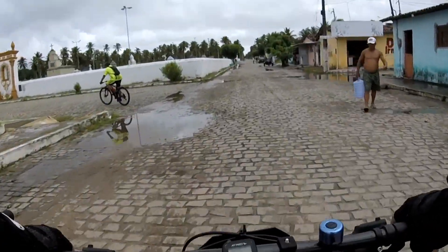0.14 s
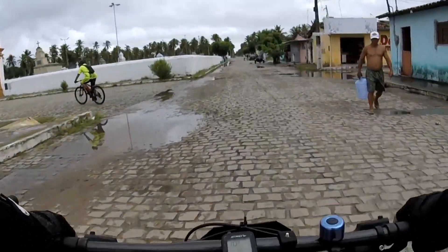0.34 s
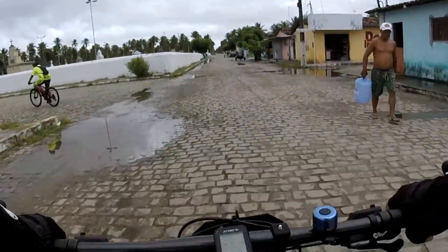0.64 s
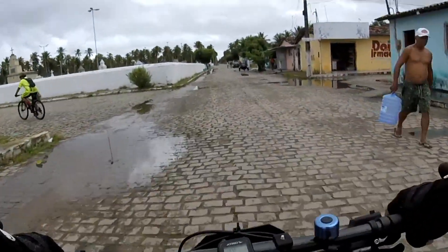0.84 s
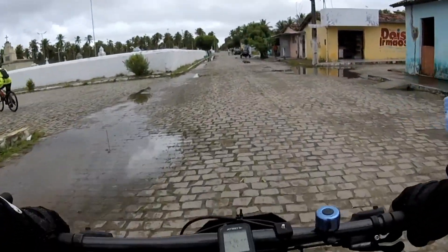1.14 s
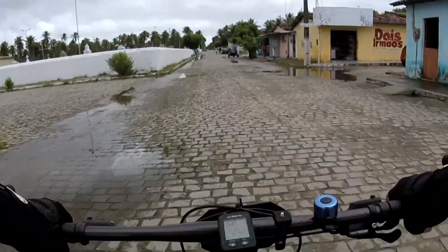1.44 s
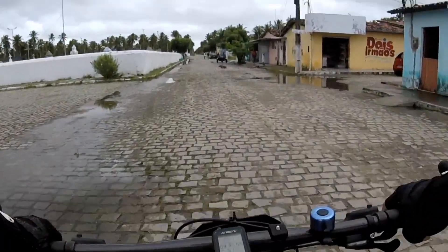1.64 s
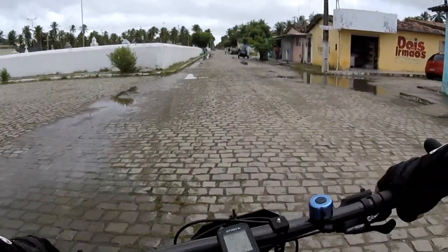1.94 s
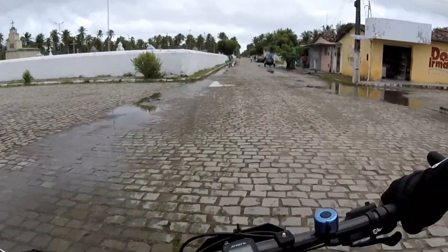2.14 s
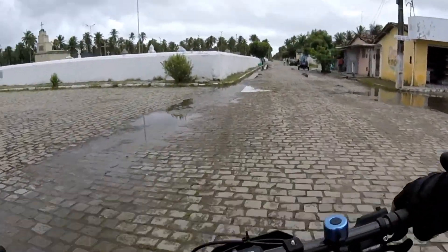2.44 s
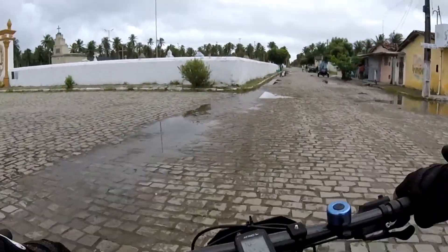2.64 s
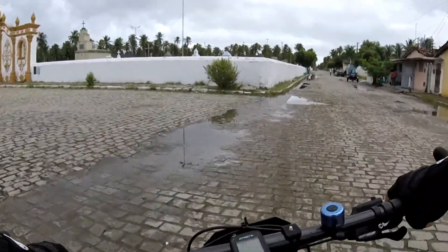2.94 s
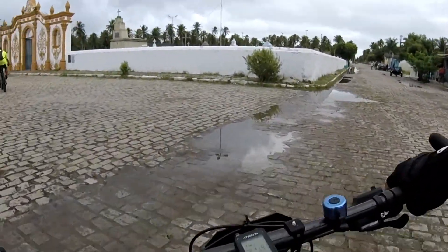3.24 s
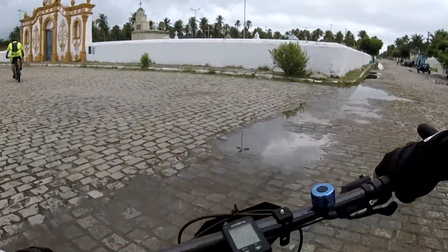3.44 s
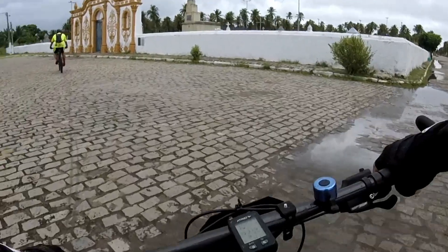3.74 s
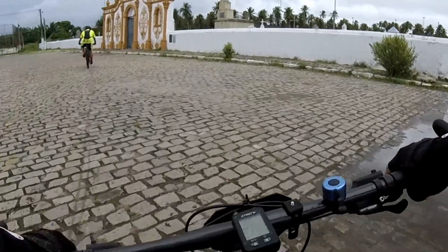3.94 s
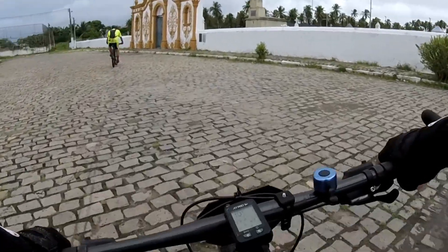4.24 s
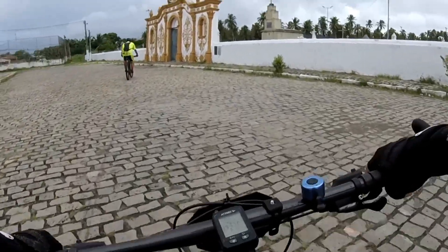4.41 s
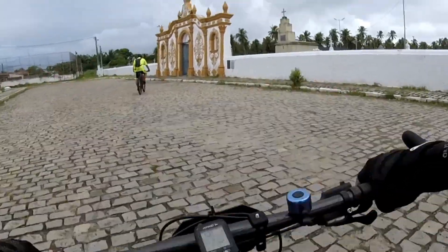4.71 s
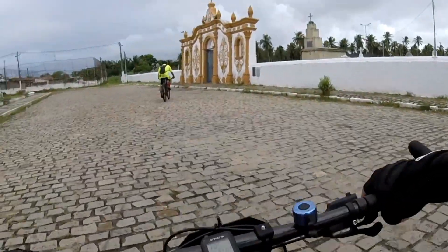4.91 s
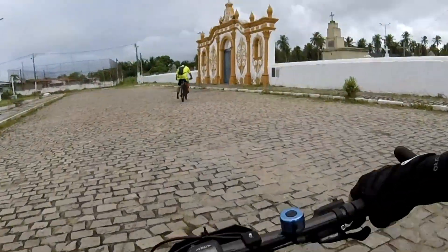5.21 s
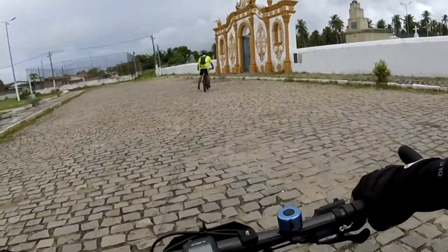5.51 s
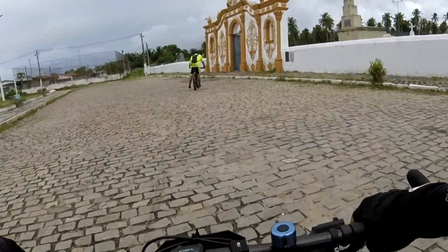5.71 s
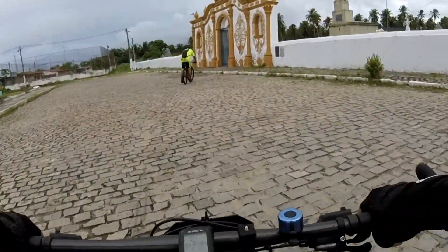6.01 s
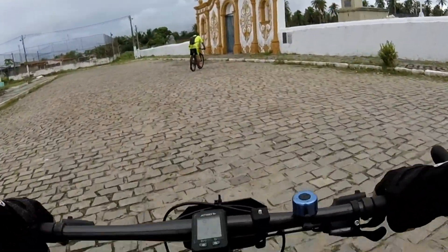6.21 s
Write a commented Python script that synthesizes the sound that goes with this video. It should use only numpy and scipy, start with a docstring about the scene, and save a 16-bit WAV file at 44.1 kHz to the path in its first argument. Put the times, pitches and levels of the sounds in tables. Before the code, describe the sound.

A bicycle coasts over rough cobblestones, its loose parts rattling and knocking above low bumps, while the freewheel ticks until pedalling resumes.

```python
"""Bicycle coasting over cobblestones

A small camera strapped to the rider hears the stones shake its mount (low noise) and jolt the frame
(short dying swings). Loose parts chatter and rattle in bursts: clicks that ring the frame's resonances.
The freewheel's clicks ring the hub; they slow and stop when the rider pedals again.
Tyres and street hiss underneath as coloured noise."""
import sys
import numpy as np
from scipy import signal
from scipy.fft import rfft, irfft
from scipy.io import wavfile
from scipy.ndimage import uniform_filter1d

SR = 44100
rng = np.random.default_rng(int(sys.argv[2]) if len(sys.argv) > 2 else 0)


def dump(signal):
    """Clip the signal to [-1, 1] and save it as 16-bit WAV at the path in sys.argv[1]."""
    limited = np.clip(np.atleast_2d(signal).T, -1, 1)
    pcm = np.round(limited * 32767).astype(np.int16)
    wavfile.write(sys.argv[1], SR, pcm)


N = 280464
T = np.arange(N) / SR  # time of every sample [s]

# a wheel meets a high stone: (time [s], level before build-up and decay [dB], base rate of the swing [Hz])
JOLT_EVENTS = [(0.046, -40, 60), (0.098, -33.5, 104), (0.212, -37, 130), (0.356, -35, 68),
               (0.393, -46, 73.5), (0.434, -37, 74.4), (0.468, -38, 112), (0.66, -40, 108),
               (0.702, -45, 103), (1.302, -41, 117), (1.55, -37.5, 63.3), (1.93, -40.5, 101),
               (2.3, -37.5, 70), (2.334, -46, 70), (2.447, -38.5, 155), (2.57, -36.5, 83.6),
               (2.738, -34.5, 100), (2.96, -32.5, 61), (2.981, -22.5, 91.4), (3.009, -34, 81),
               (3.178, -50, 85.5), (3.345, -46, 72), (3.45, -55, 90), (3.6, -37, 99), (3.651, -47, 71),
               (3.729, -28.5, 97), (3.8, -38.5, 82.5), (3.95, -52, 84.5), (4.115, -40.5, 93),
               (4.303, -28, 71), (4.359, -45, 66), (4.593, -41, 136), (4.756, -37, 81),
               (4.797, -31.5, 73.3), (5.182, -32, 65), (5.203, -33, 59.6), (5.235, -47, 76),
               (5.373, -22, 89.4), (5.447, -35.5, 158), (5.893, -37.5, 96), (6.005, -52, 84),
               (6.135, -38, 132)]
# bursts of rattling: (time [s], level [dB], length before a stretch of 1.3 [s],
# dull part against that level [dB], bright part against that level [dB])
RATTLE_BURSTS = [(0.013, -44, 0.004, 10.5, -5), (0.037, -47, 0.014, -4, -3), (0.053, -46, 0.004, -8, -3),
                 (0.088, -55, 0.008, -12, -20), (0.103, -57, 0.005, -2, -12),
                 (0.125, -52.5, 0.024, -16, -5.5), (0.332, -46.5, 0.0064, -7, -12),
                 (0.406, -56, 0.018, 10, 1), (0.67, -65, 0.012, 6, 6), (0.704, -48, 0.019, -2, -5.5),
                 (0.848, -66.5, 0.02, 16.5, 1), (0.86, -52, 0.0088, -8, -1), (0.889, -48.5, 0.0054, 1, -27),
                 (1.004, -66, 0.012, 15, 0), (1.256, -66, 0.003, -8, 8), (1.308, -54, 0.0093, 4, -14),
                 (1.323, -60, 0.015, 12.5, 0), (1.354, -71, 0.011, -5, -8), (1.386, -71, 0.0067, -5, 5),
                 (1.497, -53.5, 0.013, -9, 1.5), (1.511, -48, 0.0063, -9, -6),
                 (1.52, -43.5, 0.0033, 0, -13), (1.533, -47, 0.016, -13, -21),
                 (1.555, -39.5, 0.0054, -4, -9), (1.569, -49, 0.0094, -4, 1.5), (1.601, -54, 0.01, -11, 1),
                 (1.617, -47.5, .009, -7, -5.5), (1.951, -50, 0.0082, -10, -28),
                 (2.017, -55, 0.01, -15, -6), (2.347, -53, 0.013, -12, -7), (2.436, -60, 0.018, 12, -2),
                 (2.603, -56, .01, 5.5, -5), (2.728, -46, 0.0072, -12, -20), (2.741, -57, 0.011, 8.5, -18),
                 (2.931, -41.5, 0.0019, 1, -23), (2.937, -45.5, 0.014, -14, -7),
                 (2.946, -41, 0.0025, -13, -5), (2.979, -41, 0.004, -3, -9),
                 (2.987, -41.5, 0.0067, -3, -17), (2.999, -53, .006, -6, 3), (3.02, -49, .012, -6, -12),
                 (3.227, -54, 0.022, -15, -25), (3.38, -44, 0.0072, -22, -15),
                 (3.396, -70, 0.0044, -15, -18), (3.478, -59, 0.0095, 8, -3),
                 (3.612, -44.5, 0.0071, -14, -36), (3.636, -54, .012, -6, -8),
                 (3.656, -50.5, 0.012, 6, -2.5), (3.673, -49.5, 0.014, 2, -5), (3.705, -49, 0.0027, 0, -7),
                 (3.729, -47, .009, -6, -25), (3.756, -53.5, 0.016, -29, -1), (3.799, -49, 0.005, -12, -20),
                 (3.8088, -41.5, 0.0019, -1, -10.5), (3.975, -58, 0.0066, -4, 4),
                 (4.011, -56, 0.0075, 3.5, -3), (4.019, -55, 0.013, 2, 2.5), (4.046, -68, 0.0043, -1, -5),
                 (4.131, -50.5, 0.01, 2, -15), (4.193, -51, 0.0095, -16, -24),
                 (4.288, -42.5, .006, -6, -18), (4.298, -44, 0.011, -2.5, -11.5),
                 (4.355, -52, 0.0097, -9, -3), (4.375, -46.5, 0.014, -12, -7.5), (4.39, -50, 0.013, 0, -14),
                 (4.408, -54, 0.0068, -2, -11), (4.503, -70, .005, -8, -14), (4.54, -73, .005, -13, -14),
                 (4.599, -54, 0.02, -4, -18), (4.638, -50, .016, -10, -14), (4.685, -56, 0.012, 6.5, 2),
                 (4.691, -49.5, 0.018, -6, -12), (4.708, -65, .012, -12, 5), (4.767, -47, .01, -4, -16),
                 (4.78, -46, 0.014, -3, -9), (4.792, -56, 0.0098, -6, 1), (4.824, -43, 0.013, -4, -6),
                 (4.835, -45.5, .016, -5, -7), (4.922, -51, 0.008, 1, -14), (4.937, -53, 0.019, -6, -3),
                 (5.067, -65, 0.0053, -8, -14), (5.126, -50, 0.0086, -10, -15),
                 (5.167, -50.5, 0.023, -11, -33), (5.205, -53, 0.011, 7, -1), (5.224, -59, 0.011, -9, 4),
                 (5.261, -45, 0.0035, -12, -22), (5.279, -52, .018, -19, -25),
                 (5.308, -48.5, 0.0089, 0, -2), (5.3646, -35.5, 0.0018, 0.5, -20),
                 (5.37, -48, 0.011, -8, -21), (5.384, -50, 0.003, -5, -20), (5.409, -60, 0.012, -15, -20),
                 (5.428, -67, 0.006, -10, 0), (5.49, -48, 0.0053, -2, -19), (5.578, -45, 0.0069, -19, -17),
                 (5.623, -53.5, 0.027, -4, -16), (5.731, -66, 0.021, -7, -20),
                 (5.871, -54, 0.0061, -5, -15), (5.884, -49, 0.0044, 4, -16), (5.895, -46, 0.013, -9, -25),
                 (5.955, -60, 0.008, -10, -8), (5.974, -57, 0.003, 6, -10), (6.03, -66, 0.003, -10, 5),
                 (6.17, -58, 0.01, 3, -10), (6.091, -52, 0.0085, 0, -27), (6.249, -49, 0.008, -6, -22),
                 (6.256, -55, 0.005, 9, -22), (6.311, -53, .015, -12, -25), (6.288, -46, 0.0054, -16, -18),
                 (6.331, -47.5, 0.008, -1, -20), (6.345, -46, 0.005, -3, -10)]
# what the knocked frame and mount ring with, in dull, main, hard, bright and thin groups:
# (pitch [Hz], width of one filter pass [Hz], relative level [dB])
FRAME_MODES = [
    [(329, 254, 4.5), (464, 125, -3), (564.6, 297, 2), (746, 363, -3.5)],
    [(1315, 266, 2.5), (1463, 230, -1.5), (1608, 117, -5)],
    [(2191, 400, 4), (2528, 640, 3)],
    [(2847, 110, 4), (3534, 360, 2.5), (4006, 130, 0.5), (4130, 170, -0.5)],
    [(6360, 450, 0.5), (7250, 790, 1), (8230, 1040, -2.5)],
]


def amp(db):
    """Turn decibels into a plain factor."""
    return 10 ** (np.asarray(db) / 20)


def evened(x):
    """Scale a signal to an average (RMS) size of one."""
    return x / np.sqrt(np.mean(x ** 2) + 1e-20)


def curve(table, index):
    """Draw straight lines through one column of a table, sample by sample."""
    rows = np.array(table)
    return np.interp(T, rows[:, 0], rows[:, index])


def noise(spectrum):
    """Steady noise of unit size, coloured by a table of pitch and level."""
    f, db = np.transpose(spectrum)
    hz = np.fft.rfftfreq(N, 1 / SR)
    colour = amp(np.interp(np.log(hz + 1), np.log(f + 1), db))
    return evened(irfft(rfft(rng.standard_normal(N)) * colour, N))


def flicker(seconds):
    """Random wandering of unit size: noise averaged twice over the given time."""
    width = int(seconds * SR)
    return evened(uniform_filter1d(uniform_filter1d(rng.standard_normal(N), width), width))


def ring(clicks, modes):
    """Every click swells and dies in each resonance; filtering twice keeps the gaps between them dark."""
    out = np.zeros(N)
    for hz, width, db in modes:
        b, a = signal.iirpeak(hz, hz / width, SR)
        once = signal.lfilter(b, a, clicks)
        twice = signal.lfilter(b, a, once)
        out += amp(db) * twice * np.sqrt(SR / width)
    return out


def settling(table, db, seconds):
    """A level that jumps at each event of a table and dies away."""
    rows = np.array(table)
    jumps = np.bincount((rows[:, 0] * SR).astype(int), amp(rows[:, 1] + db), N)
    return signal.lfilter([1], [1, -np.exp(-1 / (seconds * SR))], jumps)


def shaking():
    """The microphone sways with the body and picks up a lumpy rumble through its mount."""
    # colour of the body's sway: (pitch [Hz], relative level per Hz [dB])
    sway_colour = [(3, -40), (6, -3), (14, 0), (24, -5), (32, -14), (44, -34), (70, -70), (200, -130)]
    # strength of the sway before its flicker: (time [s], level [dB])
    sway_db = [(0.0, -32), (0.23, -30), (0.28, -51), (0.34, -27), (0.6, -40.5), (0.92, -28), (0.96, -48),
               (1.03, -32), (1.08, -50), (1.27, -31), (1.4, -37), (1.47, -29), (1.5, -38.5), (1.7, -34.5),
               (1.73, -43), (1.81, -26.5), (1.91, -38), (1.96, -33), (2.09, -45), (2.16, -33), (2.37, -36),
               (2.55, -30.5), (2.67, -44), (2.74, -22.5), (2.89, -41), (3.01, -22.5), (3.06, -38.5),
               (3.7, -33), (3.74, -35), (3.79, -24.5), (3.9, -47), (4.07, -28), (4.22, -50.5),
               (4.34, -33.5), (4.52, -52), (4.66, -28), (4.76, -41), (4.82, -32.5), (5.14, -36),
               (5.19, -26), (5.28, -37), (5.45, -23), (5.54, -50.5), (5.76, -33), (5.81, -44.5),
               (5.97, -34), (6.32, -38), (6.36, -27)]
    # how hard the stones shake the mount, before flicker and jolts: (time [s], level [dB])
    road_db = [(0.0, -39.5), (0.19, -55), (0.21, -49), (0.28, -57.5), (0.41, -42), (0.55, -53.5),
               (0.64, -56), (0.67, -44), (0.76, -51.5), (1.22, -54), (1.24, -60), (1.31, -48.5),
               (1.43, -54.5), (1.52, -47.5), (1.91, -55), (1.93, -48.5), (2.23, -54.5), (2.32, -47),
               (2.43, -55), (2.46, -44), (2.5, -58), (2.58, -44), (2.62, -55.5), (2.74, -42), (2.85, -53),
               (2.92, -54.5), (2.99, -36), (3.12, -63.5), (3.21, -48.5), (3.22, -53.5), (3.35, -44.5),
               (3.42, -72), (3.47, -44), (3.51, -54.5), (3.75, -40), (3.91, -55), (3.95, -49.5),
               (4.27, -52.5), (4.32, -42), (4.46, -53), (4.55, -58), (4.6, -47), (4.71, -49), (4.8, -41.5),
               (4.92, -54.5), (4.96, -49), (5.01, -54), (5.05, -47), (5.12, -58), (5.21, -43), (5.31, -53),
               (5.38, -36.5), (5.42, -49), (5.58, -51), (5.86, -52), (5.91, -44), (5.99, -57), (6.0, -53.5),
               (6.31, -50.5), (6.36, -39.5)]
    # colour of the rumble: (pitch [Hz], relative level per Hz [dB])
    rumble_colour = [(20, -38), (35, -0.5), (60, -7), (140, -13), (220, -21.5), (400, -25), (900, -66),
                     (3000, -110)]

    sway = noise(sway_colour)
    # smooth out the noise's own swells, so that its size follows the level table
    power = uniform_filter1d(uniform_filter1d(sway ** 2, 3000), 3000)
    sway = sway / np.sqrt(power + .1)
    sway_level = amp(curve(sway_db, index=1) + 2.0 * flicker(0.029))

    # the rumble swells after each jolt and settles
    rumble_level = amp(curve(road_db, index=1)) + settling(JOLT_EVENTS, db=-22.5, seconds=0.013)
    lumps = amp(2.5 * np.minimum(flicker(0.016), 2))
    return sway_level * sway + rumble_level * lumps * noise(rumble_colour)


def chatter():
    """Countless small knocks in clumps, a few much larger; each strikes the groups of modes unevenly."""
    # how hard loose parts chatter, before flicker and bursts: (time [s], level [dB])
    chatter_db = [(0.0, -53), (0.12, -59), (1.31, -61), (1.72, -58), (2.43, -58.5), (2.8, -60), (3.26, -62),
                  (3.56, -58.5), (4.27, -59.5), (4.41, -61.5), (4.66, -63), (4.78, -58), (5.15, -59),
                  (5.33, -56.5), (6.02, -63), (6.36, -62.5)]
    # share of each group of frame modes, dull to thin: one level each [dB]
    parts_db = (-6.5, -6, -8, -16.5, -22)

    knocks_per_s = 800 * amp(3.5 * flicker(0.0074))
    sizes = amp(2.06 * np.minimum(rng.exponential(1, N), 5))
    knocks = sizes * (rng.random(N) < knocks_per_s / SR)
    out = np.zeros(N)
    for db, modes in zip(parts_db, FRAME_MODES):
        out += amp(db) * evened(ring(knocks * rng.standard_normal(N), modes))
    # the chatter swells around each burst
    swell = uniform_filter1d(settling(RATTLE_BURSTS, db=-14.5, seconds=0.023), int(0.02 * SR))
    level = amp(curve(chatter_db, index=1)) + swell
    return level * amp(1.5 * flicker(0.037)) * out


def hiss():
    """Tyres on damp stone and the open street: coloured noise, flickering fast and faintly."""
    # colour of tyres and street: (pitch [Hz], relative level per Hz [dB])
    hiss_colour = [(90, -42), (150, -2), (325, -6), (780, -9.5), (1100, -12.5), (1280, -7), (2340, -13),
                   (3120, -15), (4700, -22), (8500, -28), (12700, -34.5), (14100, -39), (15200, -41)]
    # strength of the hiss before a fixed lift and its flicker: (time [s], level [dB])
    hiss_db = [(0.0, -69), (0.96, -69), (1.68, -69), (1.86, -69.5), (5.3, -70), (6.15, -71), (6.36, -71.5)]
    lift_db = 12.0
    return amp(curve(hiss_db, index=1) + lift_db + 1.5 * flicker(0.0065)) * noise(hiss_colour)


def freewheel():
    """Two pawls snap over the ratchet teeth and shiver, ringing the hub; pedalling locks them."""
    # the coasting freewheel: (time [s], teeth passing each pawl a second [1/s], level [dB])
    coasting = [(0, 57, -71), (.45, 64, -62), (.7, 59, -61), (.85, 65, -64), (1.0, 58, -59), (1.2, 62, -64),
                (1.5, 65, -60.5), (1.85, 58, -66), (2.1, 66, -62), (2.3, 58, -63.5), (2.6, 66, -63.5),
                (2.85, 66, -62.5), (3.1, 59, -60), (3.3, 65, -63), (3.55, 60, -64.5), (3.8, 66, -62.5),
                (4.1, 60, -64.5), (4.3, 60, -61.5), (4.55, 50, -61), (4.8, 48, -62), (4.95, 72, -58),
                (5.1, 53, -61.5), (5.25, 42, -67), (5.4, 42, -63), (5.55, 40, -64), (5.7, 41, -59),
                (5.77, 28, -58.5), (5.83, 20, -61)]
    # what the hub rings with: (pitch [Hz], width of one filter pass [Hz], relative level [dB])
    hub_modes = [(2690, 140, 5.5), (2790, 120, 6), (2905, 125, 2.5), (3230, 840, -10), (13700, 450, -23),
                 (14050, 450, -21)]

    teeth = np.cumsum(curve(coasting, index=1)) / SR
    # a pawl snaps at each whole tooth, a little early or late; the second lags by a quarter tooth
    first = np.diff(np.floor(teeth + .08 * flicker(.01)), prepend=0) > 0
    second = np.diff(np.floor(teeth - .25 + .07 * flicker(.01)), prepend=0) > 0
    unlocked = T < coasting[-1][0]
    snaps = (first + 0.35 * second) * unlocked * amp(3.0 * flicker(0.025))

    t = np.arange(600) / SR
    shiver = np.exp(-t / 0.003) * rng.standard_normal(len(t)) * 0.12
    shiver[0] = 1  # the snap itself
    snaps = signal.oaconvolve(snaps, shiver)[:N]

    hub = np.zeros(N)
    for mode in hub_modes:
        uneven = amp(2.8 * np.clip(flicker(0.0064), -2, 1.5))
        hub += ring(snaps * uneven, [mode])
    return amp(curve(coasting, index=2)) * evened(hub)


def rattles():
    """Each burst is a firm knock and uneven rebounds; every blow strikes each group of modes its own way."""
    rebounds = 36  # blows in a burst, the firm knock included
    peak, edge_db = 0.25, 25  # peak as a share of the burst; loss by squared distance from it [dB]
    knock_s = 0.0021  # the shorter a burst against this, the more it is one firm knock [s]
    s, db, length, dull_db, bright_db = np.transpose(RATTLE_BURSTS)[:, :, None]
    # the hard and thin groups follow the bright part in proportion
    hard_db = -7.5 + 0.24 * bright_db
    thin_db = -14.5 + bright_db
    parts_db = dull_db, 0, hard_db, bright_db, thin_db

    when = rng.random((len(s), rebounds))  # place within the burst, 0 to 1
    when[:, 0] = peak  # the firm knock
    at = np.minimum(((s + 1.3 * length * when) * SR).astype(int), N - 1)
    fade_db = edge_db * (when - peak) ** 2
    out = np.zeros(N)
    for part_db, modes in zip(parts_db, FRAME_MODES):
        size = (2 * rng.random(when.shape) - 1) ** 3  # cubed: many small blows, few large
        size = 0.29 * size / np.sqrt(np.mean(size ** 2, axis=1, keepdims=True)) / (1 + knock_s / length)
        size[:, :1] = knock_s / length * amp(rng.uniform(-2, 1.5, s.shape))
        # longer bursts get stronger blows, as the same number is spread over more time
        blow = size * amp(db + part_db - fade_db) * np.sqrt(length * SR / rebounds * 6)
        clicks = np.bincount(at.ravel(), blow.ravel(), N)
        out += ring(clicks, modes) / np.sqrt(len(modes))
    return out


def jolts():
    """A quick pull, then a slower push back: a short dying swing that sags in pitch."""
    swing_cycles = 2.15  # cycles of the base rate until a jolt has lost 9 dB
    out, t = np.zeros(N + SR), np.arange(SR // 4) / SR
    for s, db, hz in JOLT_EVENTS:
        # the pitch sags from 1.747 to 0.747 times the base rate
        turns = hz * (0.747 * t + 0.0064 * (1 - np.exp(-t / 0.0064)))
        build_up = (1 - np.exp(-t / 0.0017)) ** 2
        swing = -np.sin(2 * np.pi * turns) * amp(db - 9 * t * hz / swing_cycles) * build_up
        out[round(s * SR):][:len(t)] += swing
    return out[:N]


def scene():
    """Shaking and jolts reach the microphone through a mount of limited travel; the rest through the air."""
    travel = .11  # the mount gives only so far: largest swing, full scale 1
    mount = travel * np.tanh((shaking() + jolts()) / travel)
    return (mount + rattles() + chatter() + freewheel() + hiss())[None]


def record(dry):
    """The band limit of the camera: a steep filter removes the highest treble."""
    edge_hz = 15250
    lowpass = signal.firwin(511, edge_hz, window=("kaiser", 9), fs=SR)
    return signal.oaconvolve(dry, lowpass[None], "same")


dry = scene()
out = record(dry)
dump(out)
```